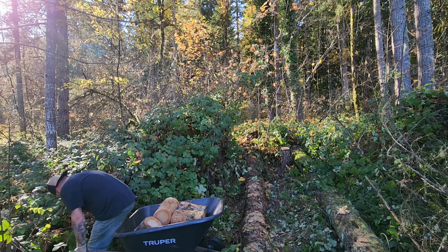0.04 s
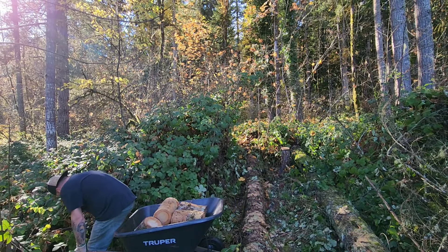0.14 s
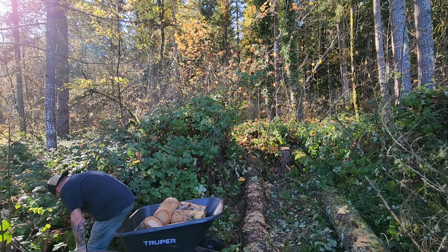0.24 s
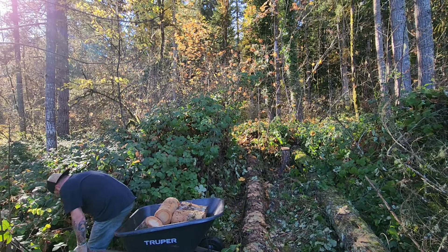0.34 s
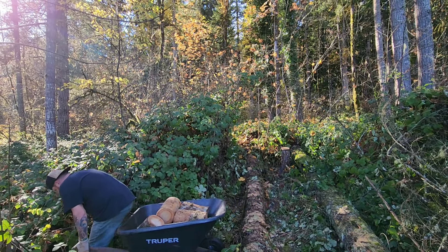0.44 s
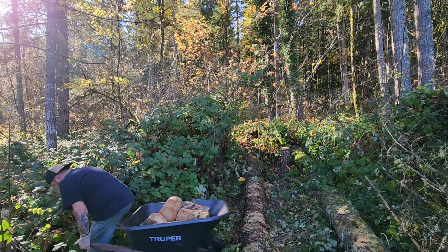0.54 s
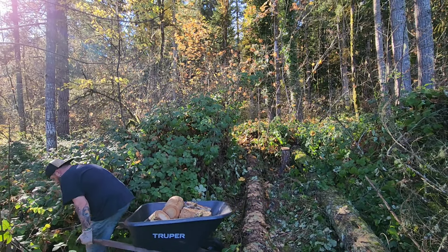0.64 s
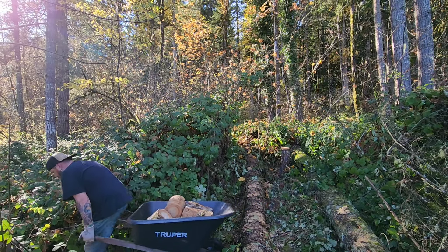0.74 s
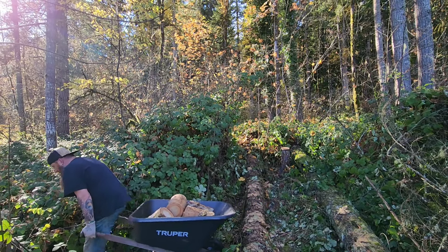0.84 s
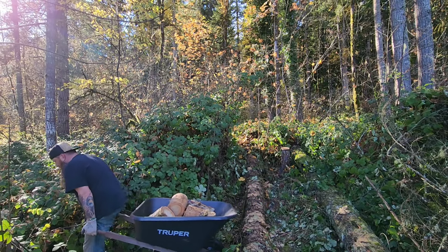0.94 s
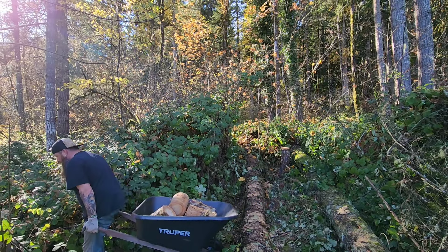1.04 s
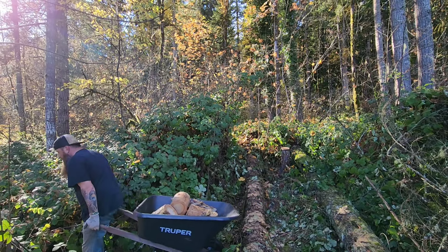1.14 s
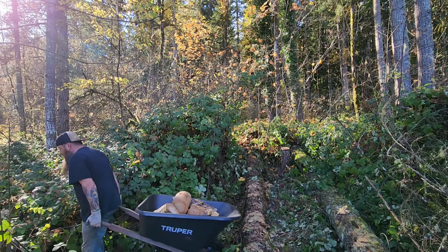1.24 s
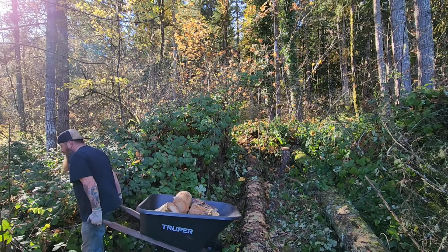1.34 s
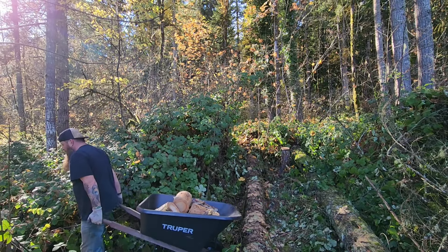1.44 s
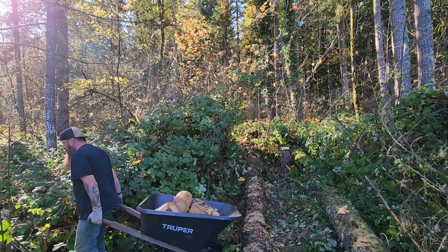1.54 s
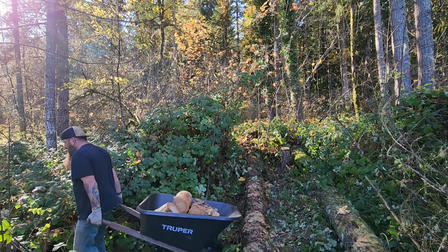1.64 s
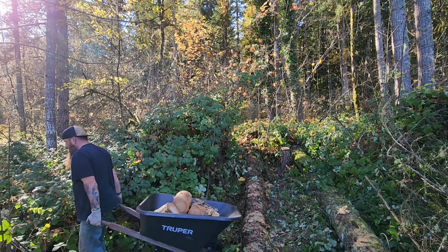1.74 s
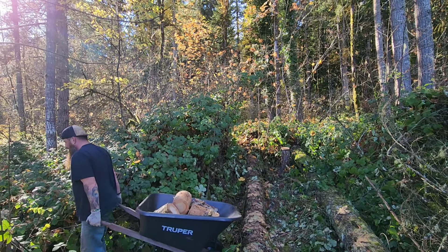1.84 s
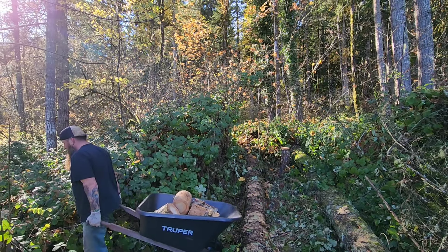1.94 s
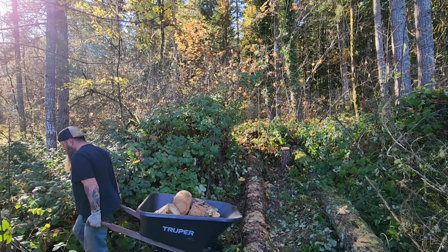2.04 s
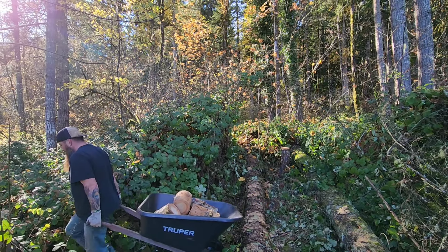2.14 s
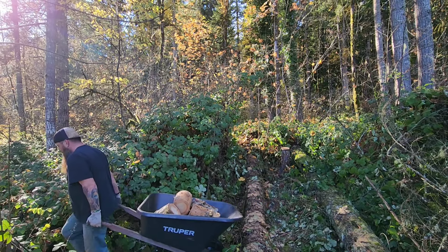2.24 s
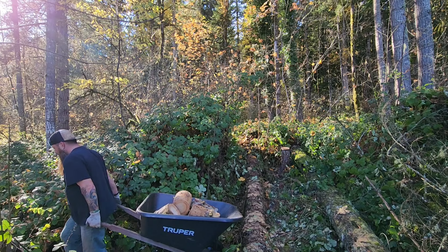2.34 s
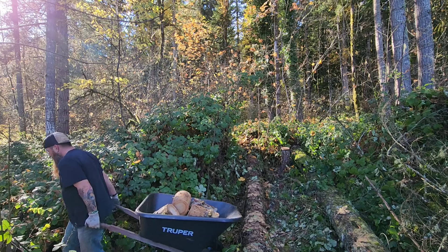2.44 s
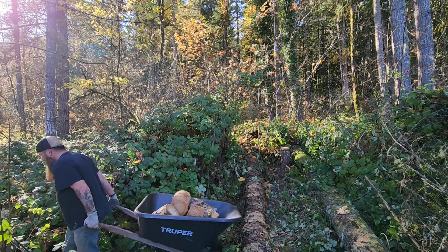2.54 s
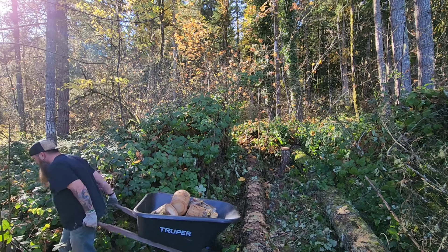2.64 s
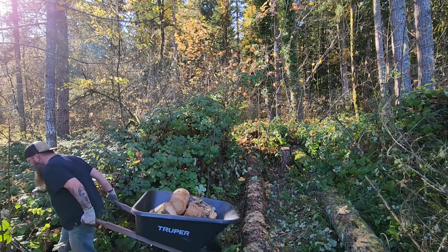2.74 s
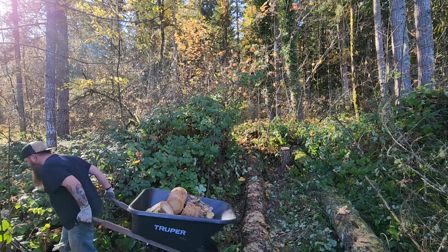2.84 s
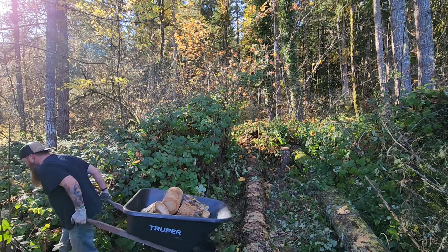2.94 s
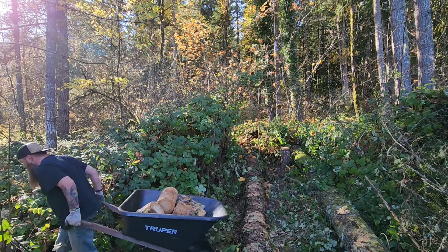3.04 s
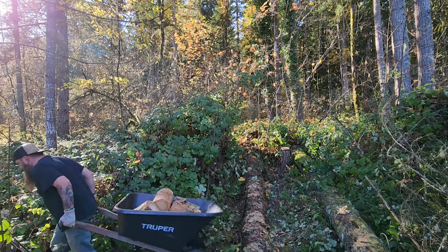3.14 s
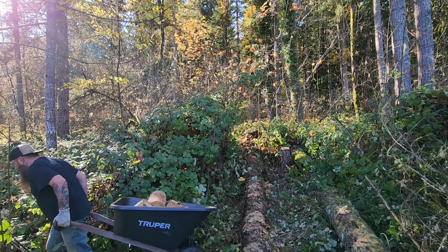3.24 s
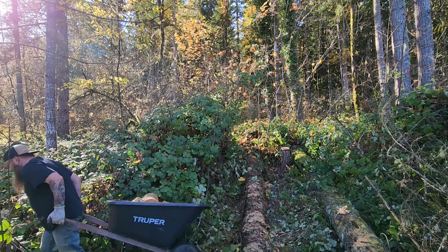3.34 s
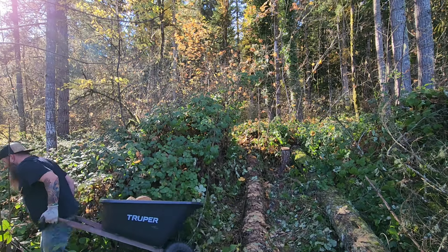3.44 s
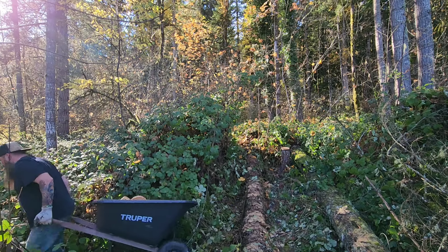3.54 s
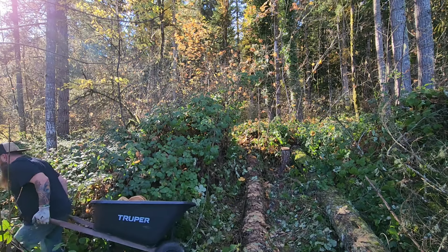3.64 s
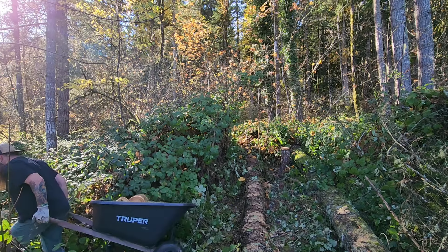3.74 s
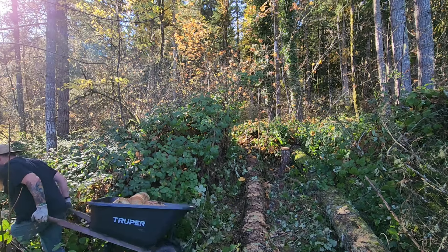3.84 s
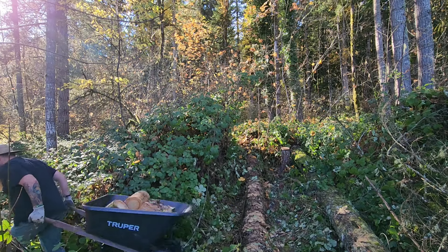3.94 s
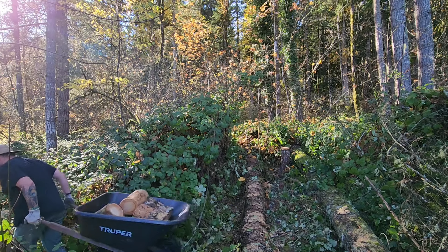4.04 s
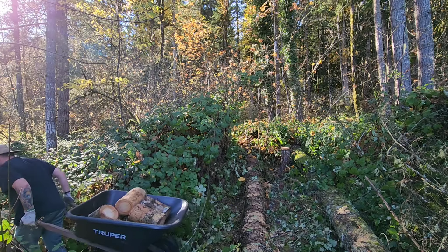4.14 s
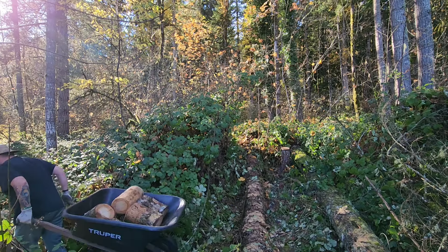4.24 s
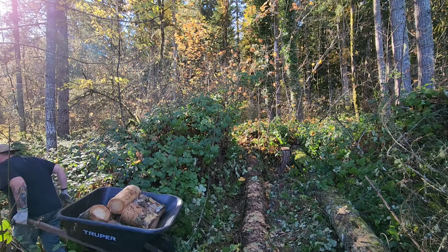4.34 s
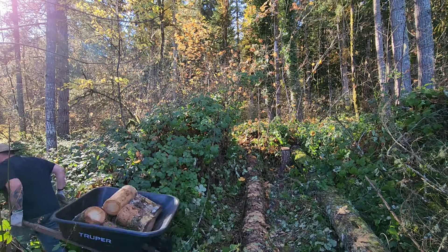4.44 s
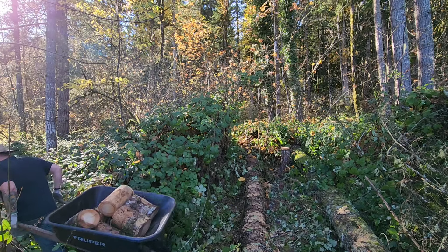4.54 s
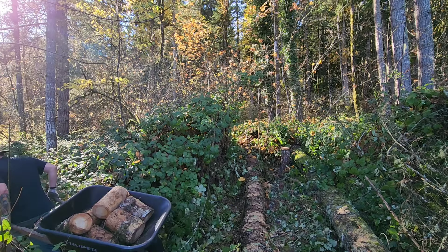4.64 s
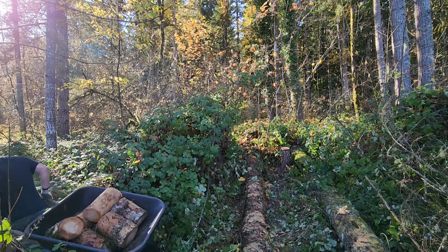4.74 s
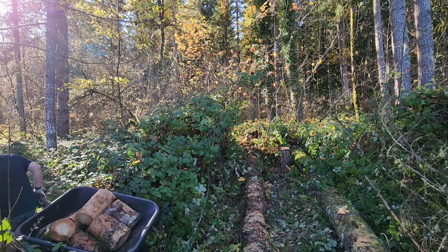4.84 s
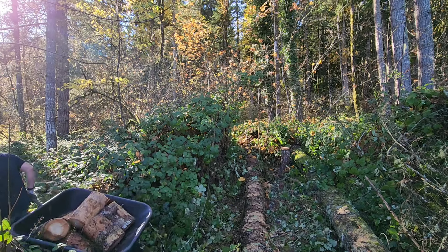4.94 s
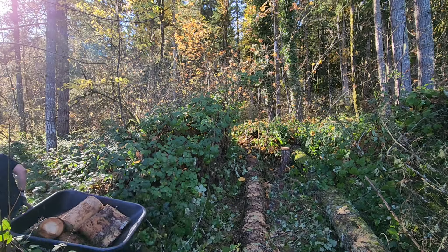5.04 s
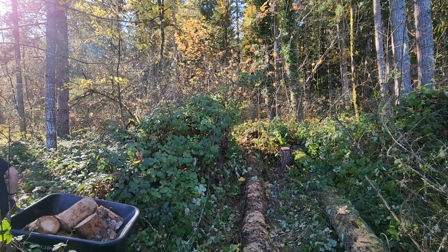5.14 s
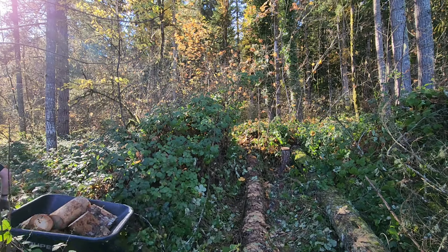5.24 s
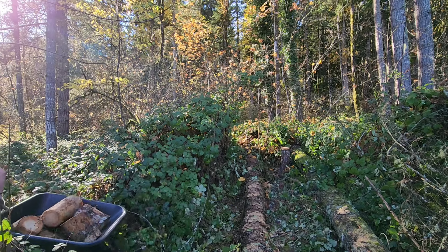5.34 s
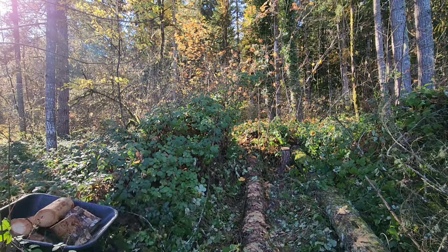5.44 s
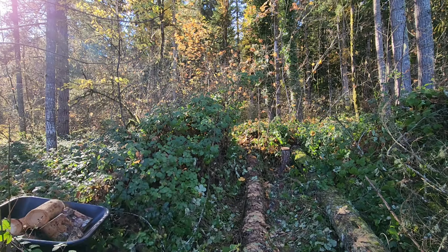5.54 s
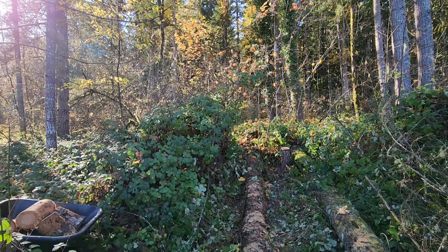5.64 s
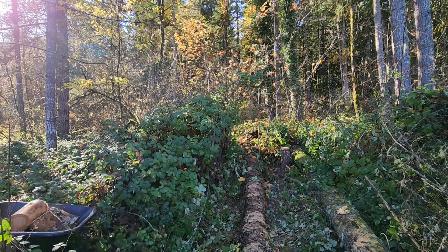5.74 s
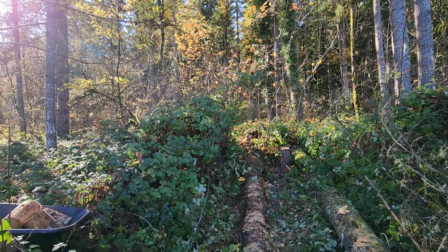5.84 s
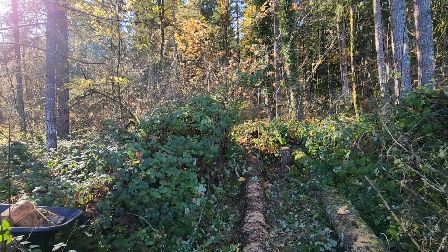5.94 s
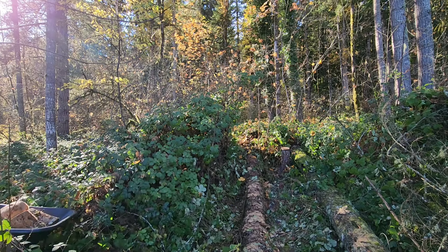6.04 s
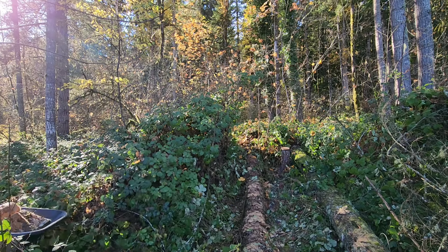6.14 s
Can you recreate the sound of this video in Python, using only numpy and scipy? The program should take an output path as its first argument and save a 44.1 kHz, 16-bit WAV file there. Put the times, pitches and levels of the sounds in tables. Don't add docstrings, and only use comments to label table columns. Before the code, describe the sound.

Heavy wood rounds thud and rattle in a wheelbarrow tub as it jolts over roots, creaks briefly, and rustles away through dry leaves.

```python
import sys
import numpy as np
from scipy import signal
from scipy.fft import rfft, irfft, next_fast_len
from scipy.io import wavfile
from scipy.ndimage import uniform_filter1d

SR = 44100
rng = np.random.default_rng(int(sys.argv[2]) if len(sys.argv) > 2 else 0)


def store_pcm(level_fs):
    pcm = np.round(np.clip(level_fs, -1, 1) * 32767).astype(np.int16)
    wavfile.write(sys.argv[1], SR, np.atleast_2d(pcm).T)


def voltage_ratio(decibels):
    exponent = np.asarray(decibels, float) / 20
    return 10 ** exponent


N = 273414
RIGHT_LAG = 5

# pitch_hz, likeness (0-1)
PORT_LIKENESS = [(60, 0.98), (250, 0.98), (550, 0.81), (1100, 0.38), (2200, 0.46), (5000, 0.23),
                 (15000, 0.044)]
# pitch_hz, left_minus_right_db
LEFT_LEAN = [(60, 1.2), (300, 1.64), (1000, 4), (12000, 2.5)]
# pitch_hz, level_db
FOREST_COLOUR = [(12, -42), (25, -4), (55, 4), (110, -9), (180, -13.5), (350, -11), (1100, -25),
                 (7300, -38.5), (9500, -54), (15000, -92)]
# start_s, level_db, resonance_hz
SWISH_PATH = [
    (4.95, -81, 3000),
    (5.1, -59, 3800),
    (5.25, -56, 4500),
    (5.42, -63, 3770),
    (5.55, -68, 4570),
    (5.66, -65, 4730),
    (5.87, -56.5, 4060),
    (6.0, -59.5, 4000),
    (6.2, -61, 3570),
]
# start_s, peak_db, tyre_pitch_hz
ROOT_DROPS = [
    (2.908, -41, 76),
    (3.15, -36, 77),
    (3.471, -36.5, 74.4),
    (3.629, -25.5, 84),
    (5.103, -27.5, 74),
    (4.73, -33, 61),
    (5.572, -31.5, 84),
    (5.831, -48, 74),
]
# start_s, slips_per_s, level_db
CREAK_PATH = [
    (3.954, 29, -53),
    (4.03, 58, -51),
    (4.13, 92, -53),
    (4.165, 115, -51),
    (4.21, 116, -51),
    (4.275, 54, -52),
    (4.39, 48, -52),
    (4.44, 88, -56),
    (4.52, 60, -59),
]
# pitch_hz, width_hz, level_db
FRAME_MODES = [(584, 130, 2.5), (800, 340, 2), (1040, 146, 2), (1363, 86, -2.5), (2170, 110, -1.5),
               (2720, 120, -3)]
# time_s, effort_db
ROLL_EFFORT = [(0, -82), (0.15, -45.5), (0.31, -57.5), (0.45, -49.5), (0.9, -55.5), (1.2, -61), (1.69, -64),
               (2.0, -62.5), (2.68, -59.5), (2.83, -50.5), (3.5, -46), (3.78, -41), (3.9, -55),
               (4.63, -53.5), (4.75, -48), (5.23, -41.5), (5.8, -52.5), (6.2, -47)]
# time_s, contact_db
BRUSH_CONTACT = [(0.35, -90), (0.5, -64), (0.75, -60.5), (1.02, -70.5), (1.5, -78), (1.6, -61),
                 (1.85, -78.5), (2.1, -65.5), (2.3, -82.5), (2.46, -80), (2.52, -62), (2.68, -68),
                 (3.0, -58), (3.66, -51.5), (3.74, -66), (4.1, -55.5), (4.6, -57.5), (5.23, -51.5),
                 (6.2, -55.5)]
# pitch_hz, level_db
RUMBLE_COLOUR = [(8.8, -45.5), (15, 10.5), (70, 0.5), (86, -2), (108, -3.5), (172, -32), (200, -25.5),
                 (260, -48), (440, -120)]
# pitch_hz, level_db
SHAKE_COLOUR = [(65, -22.5), (110, -2.5), (177, -0.5), (258, -4), (300, -2.5), (419, -8.5), (700, -12.5),
                (900, -17), (1170, -43.5), (1980, -120)]
# pitch_hz, level_db
SCRAPE_COLOUR = [(400, -16.5), (700, -1), (1000, 3), (1500, 4), (2600, -6.5), (3600, -28), (5000, -41)]
# pitch_hz, level_db
LEAF_COLOUR = [(1650, -7.5), (2800, -4), (3500, -4), (4500, -4.5), (5900, -7), (7500, -7), (9600, -11),
               (15300, -14.5), (15800, -59)]
# start_s, peak_db, left_minus_right_db
TWIG_SNAPS = [(0.581, -37.5, 4), (0.767, -46, 1.5), (0.9272, -30.5, 7), (0.952, -33, 4), (1.5709, -32, 10),
              (1.6652, -28.5, 7.5), (1.7216, -43, 6), (1.9638, -32, -1), (2.5449, -31.5, 6),
              (2.852, -44.5, 8), (2.973, -45, 3), (3.025, -39, 6), (3.1818, -37, 2), (3.455, -36, 4),
              (3.527, -33, 5), (3.5604, -22.5, 5), (3.6276, -33, 8), (4.411, -38.5, 0), (4.716, -20.5, 5),
              (4.837, -32, 3), (4.855, -32, 6), (5.524, -43, 7), (5.786, -31.5, 2), (5.206, -39, 6),
              (5.99, -35, 7), (1.591, -43, 1)]
# start_s, peak_db, left_minus_right_db
CRISP_LEAVES = [(1.9, -45, 7), (3.768, -27, 2), (3.8296, -39, 2), (3.8772, -37, 4), (4.0024, -37, 6),
                (4.041, -32.5, 5), (4.3222, -46.5, 0), (4.5075, -38.5, 5), (4.5868, -41, 4),
                (1.243, -44, 11), (5.61, -52, 1), (0.99, -58, 3), (4.717, -13, 2), (1.9645, -20.5, 5.5)]
# pitch_hz, level_db
CRACK_COLOUR = [(1470, -10), (2500, -10), (3420, -10), (3810, -2.5), (4150, -3), (6670, -12), (7250, -9),
                (8710, -7), (9270, -9), (15600, -13)]
# start_s, peak_db, pitch_hz, t60_s
WOOD_KNOCKS = [(0.454, -34, 870, 0.034), (0.583, -30, 1330, 0.087), (0.598, -31.5, 910, 0.055),
               (0.744, -34, 940, 0.08), (0.764, -32.5, 1200, 0.03), (0.846, -40, 1390, 0.022),
               (0.927, -37, 860, 0.022), (0.954, -34, 990, 0.0069), (1.591, -38.5, 1170, 0.01),
               (1.6655, -30.5, 894, 0.0097), (1.962, -36.5, 830, 0.19), (2.545, -35.5, 1740, 0.013),
               (2.803, -36, 780, 0.076), (2.893, -30, 1170, 0.071), (3.147, -35.5, 1080, 0.042),
               (3.337, -36.5, 1590, 0.05), (3.5605, -16.5, 1240, 0.017), (3.62, -26.5, 1500, 0.067),
               (3.83, -37.5, 800, 0.028), (4.093, -29, 1090, 0.023), (4.716, -17, 1350, 0.048),
               (4.756, -31.5, 1380, 0.12), (5.048, -34, 1390, 0.18), (5.122, -32, 830, 0.02),
               (5.522, -31, 740, 0.02), (5.916, -34, 1035, 0.11), (6.128, -32, 714, 0.087),
               (1.571, -52, 910, 0.012), (0.642, -39.5, 810, 0.03), (0.665, -42, 1520, 0.032),
               (0.712, -44, 1910, 0.03), (3.405, -39, 750, 0.066), (3.46, -43.5, 796, 0.054),
               (4.483, -43, 616, 0.031), (4.466, -41, 2000, 0.05)]
# start_s, peak_db, pitch_hz
WALL_TAPS = [(0.4534, -36, 2820), (0.798, -45, 2870), (1.106, -49, 1290), (1.134, -49.5, 1040),
             (1.176, -50, 1520), (1.322, -56, 1650), (1.721, -43.5, 620), (4.393, -39, 890),
             (1.9644, -30.5, 3800), (1.975, -36.5, 3720), (4.712, -32, 1300), (4.718, -24, 2200),
             (3.566, -37, 4570), (3.629, -30, 4500), (4.719, -27, 3830), (2.364, -50, 856),
             (2.852, -41.5, 1560), (2.992, -39.5, 2070), (3.164, -35.5, 1390), (3.232, -39.5, 1120),
             (3.356, -35.5, 1650), (3.5267, -25.5, 2440), (3.6202, -23, 2450), (4.131, -37, 1360),
             (5.098, -32, 970), (5.201, -34.5, 1460), (5.954, -41, 695), (6.1549, -30, 3670),
             (6.1279, -38.5, 2760), (5.61, -47, 4800), (5.206, -32, 3420)]
# pitch_hz, level_db
KNOCK_COLOUR = [(350, -16), (550, 5), (800, -5), (1300, 3), (1700, -3), (2600, -7.5), (4000, -15),
                (9000, -35)]
# start_s, peak_db, body_pitch_hz, ring_t60_s
LOG_DROPS = [(0.452, -33, 178, 0.091), (0.594, -29.5, 307, 0.15), (1.72, -42, 383, 0.072),
             (1.967, -33.5, 248, 0.093), (2.894, -26.5, 332, 0.099), (3.127, -36, 121, 0.049),
             (3.618, -18.5, 207, 0.041), (4.092, -23, 160, 0.048), (4.256, -37, 205, 0.19),
             (4.719, -22, 174, 0.12), (5.523, -23, 186, 0.017), (5.917, -29, 336, 0.086)]
# start_s, peak_db, body_pitch_hz, ring_t60_s
LOAD_BUMPS = [(0.763, -25, 190, 0.044), (0.849, -51, 203, 0.047), (3.144, -26, 192, 0.04),
              (3.166, -29.5, 171, 0.089), (3.337, -29, 333, 0.26), (3.354, -32, 232, 0.13),
              (3.402, -34, 233, 0.04), (3.46, -39, 178, 0.09), (3.546, -35.5, 294, 0.16),
              (3.5617, -15, 480, 0.039), (3.47, -40, 110, 0.081), (3.566, -31, 122, 0.05),
              (3.63, -22, 173, 0.13), (3.713, -27, 320, 0.12), (3.796, -37, 362, 0.12),
              (3.949, -40, 207, 0.019), (3.981, -36, 157, 0.024), (4.287, -25, 220, 0.17),
              (4.345, -32.5, 314, 0.096), (4.48, -32, 282, 0.045), (4.91, -63, 179, 0.06),
              (5.048, -36, 260, 0.21), (5.116, -27, 263, 0.069), (5.179, -28, 113, 0.14),
              (5.33, -40, 119, 0.026), (5.752, -46.5, 344, 0.11), (5.953, -33.5, 267, 0.043),
              (6.125, -31.5, 387, 0.15), (2.895, -27.5, 522, 0.072), (4.756, -24.5, 264, 0.073),
              (4.72, -27, 584, 0.052)]
# start_s, peak_db, body_pitch_hz
LOAD_RATTLES = [(0.918, -46.5, 175), (1.947, -44.5, 189), (2.047, -52, 420), (2.091, -45.5, 458),
                (2.123, -51, 420), (2.166, -51, 402), (2.363, -47, 407), (2.421, -50, 310),
                (2.485, -45, 258), (2.611, -49, 242), (2.666, -47, 266), (2.707, -43.5, 162),
                (2.759, -41, 184), (2.802, -43, 327), (3.094, -37, 162), (3.9, -42.5, 344),
                (5.269, -45, 198), (0.533, -58, 200), (1.13, -48.5, 358), (4.03, -45, 402),
                (4.097, -29.5, 377), (4.79, -36, 247), (0.454, -41, 567), (2.008, -42, 440),
                (0.753, -39, 221), (4.009, -38, 220), (4.045, -43, 200), (4.06, -43, 220), (4.13, -37, 302),
                (2.69, -54, 395), (1.752, -50, 454)]
# pitch_hz, width_hz, level_db
TUB_MODES = [(81.5, 20, 4.5), (121, 58, -21), (171, 26, 4), (213.4, 61, 8), (320, 59, 8), (423, 84, -5.5),
             (556, 70, 11), (640, 270, -17)]


def evened(x):
    return x / np.sqrt(np.mean(x ** 2) + 1e-20)


def peaked(x):
    return x / (abs(x).max() + 1e-12)


def seconds(length_s):
    return np.arange(int(length_s * SR)) / SR


def smoothed(x, width):
    return uniform_filter1d(uniform_filter1d(x, width), width)


def read(points, hz):
    f, value = np.transpose(points)
    return np.interp(np.log(hz + 1), np.log(f + 1), value)


def add(mix, s, sound):
    part = mix[..., round(s * SR):][..., :sound.shape[-1]]
    part += sound[..., :part.shape[-1]]


def ring(x, hz, width):
    r = np.exp(-np.pi * width / SR)
    return signal.lfilter([np.sin(2 * np.pi * hz / SR)], [1, -2 * r * np.cos(2 * np.pi * hz / SR), r * r], x)


def coloured(x, points):
    level_db = read(points, np.abs(np.fft.fftfreq(4096, 1 / SR)))
    log_gain = np.log(voltage_ratio(np.maximum(level_db, -70)))
    taps = np.fft.ifft(np.exp(np.conj(signal.hilbert(log_gain)))).real[:2048]
    taps = taps.reshape((1,) * (x.ndim - 1) + (-1,))
    return signal.oaconvolve(x, taps, axes=-1)[..., :x.shape[-1]]


def ports(a, b):
    size = next_fast_len(N)
    hz = np.fft.rfftfreq(size, 1 / SR)
    same = np.clip(read(PORT_LIKENESS, hz), 0, 1)
    blend = same * rfft(a, size) + np.sqrt(1 - same ** 2) * rfft(b, size)
    right = irfft(blend / voltage_ratio(read(LEFT_LEAN, hz)), size)[:N]
    return np.array([a, np.roll(right, RIGHT_LAG)])


def grains(points, per_s, spread_db, hiss, lump_s, lump_db, patch_db):
    sign, air = rng.standard_normal((2, N)), rng.standard_normal((2, N))
    size = np.minimum(rng.exponential(1, N), 3)
    struck = rng.random(N) < per_s / SR
    clicks = evened(sign * voltage_ratio(spread_db * size) * struck)
    lumps = evened(smoothed(rng.standard_normal(N), max(int(lump_s * SR), 2)))
    z = signal.stft(coloured(clicks + hiss * air, points), nperseg=256)[2]
    patches = rng.standard_normal(z.shape[:0:-1]).T
    patches = uniform_filter1d(uniform_filter1d(patches, size=4, axis=0), size=22, axis=1)
    drifting = signal.istft(z * voltage_ratio(patch_db * evened(patches)), nperseg=256)[1][:, :N]
    a, b = drifting * voltage_ratio(lump_db * lumps)
    return evened(ports(a, b))


def forest_floor():
    return voltage_ratio(-62) * grains(FOREST_COLOUR, 260, 1.5, 5.0, 0.048, 1.5, 2.5)


def trees(x):
    t = seconds(.25)
    taps = rng.standard_normal((2, len(t))) * (rng.random((2, len(t))) < .2)
    taps = taps * voltage_ratio(-60 * t / 0.09) * (t > .004)
    return ports(*signal.oaconvolve(x, taps / np.linalg.norm(taps[0]), axes=1)[:, :N])


def swish():
    s, db, hz = np.transpose(SWISH_PATH)
    t, width_hz = np.arange(N) / SR, 1200
    r = np.exp(-np.pi * width_hz / SR)
    wander = evened(smoothed(rng.standard_normal(N), 900))
    path_hz = np.interp(t, s, hz) * (1 + 0.095 * wander)
    turn = np.exp(2j * np.pi * np.cumsum(path_hz) / SR)
    low = rng.standard_normal((2, N)) / turn
    for _ in range(2):
        low = signal.lfilter([1 - r], [1, -r], low)
    clumps = evened(smoothed(rng.standard_normal(N), 500))
    return voltage_ratio(np.interp(t, s, db, -120) + 2.5 * clumps) * evened(ports(*(turn * low).real))


def roots():
    t, out = seconds(.3), np.zeros(N)
    t60, rise_s = 0.16, 0.012
    for s, db, hz in ROOT_DROPS:
        swell = voltage_ratio(db - 60 * t / t60) * (1 - np.exp(-t / rise_s))
        add(out, s, swell * 2 * np.sin(2 * np.pi * hz * t))
    return ports(out, out)


def creak():
    s, per_s, db = np.transpose(CREAK_PATH)
    t = np.arange(N) / SR
    turns = np.cumsum(np.interp(t, s, per_s, 0, 0)) / SR
    slips = np.diff(np.ceil(turns), prepend=0) * voltage_ratio(1.5 * rng.standard_normal(N))
    slips /= np.sqrt(np.interp(t, s, per_s) / 100)
    loose_db = np.interp(t, (4, 4.44), (-9, 0))
    tone = np.zeros(N)
    for f, width, level in FRAME_MODES:
        mode = np.roll(ring(slips, f, width), int(f / 12))
        tone += voltage_ratio(level + loose_db * (f > 2000)) * mode
    tone = tone / tone[(t > s[0]) & (t < s[-1])].std() * voltage_ratio(np.interp(t, s, db) - 1.0)
    return np.array([tone, np.roll(tone, RIGHT_LAG) * voltage_ratio(-3.5)])


def bend():
    start_s, end_s, width_hz = 4.01, 4.075, 200
    t, out = seconds(end_s - start_s), np.zeros(N)
    turn = np.exp(2j * np.pi * np.cumsum(np.linspace(597, 1210, len(t))) / SR)
    r = np.exp(-np.pi * width_hz / SR)
    rub = signal.lfilter([1 - r], [1, -r], rng.standard_normal(len(t)) / turn)
    add(out, start_s, voltage_ratio(-45.5) * evened((turn * rub).real) * np.sqrt(np.hanning(len(t))))
    return ports(out, out)


def snaps(rows, low_hz):
    t, out = seconds(.12), np.zeros((2, N))
    for (s, db, pan_db), draw in zip(rows, rng.standard_normal((len(rows), 3, len(t)))):
        t60 = np.clip(0.016 - 0.35 * (db + 41), .004, .1)
        burst = (voltage_ratio(-60 * t / t60) + 0.083 * voltage_ratio(-60 * t / 0.11)) * np.minimum(t / 0.0011, 1)
        pair = np.array([draw[0], 0.62 * draw[0] + 0.99 * draw[1]])
        pair[:, round(.001 * SR)] = 2.84
        crack = coloured(pair * burst * voltage_ratio(3.4 * draw[2]), CRACK_COLOUR)
        crack = peaked(signal.lfilter(*signal.butter(2, low_hz, "high", fs=SR), crack))
        left, right = voltage_ratio(db) * crack * voltage_ratio(np.array([[.5], [-.5]]) * pan_db)
        add(out[0], s, left)
        add(out[1], s + RIGHT_LAG / SR, right)
    return out


def drag():
    t = np.arange(N) / SR
    roll_db = np.interp(t, *np.transpose(ROLL_EFFORT))
    brush_db = np.interp(t, *np.transpose(BRUSH_CONTACT))
    jolt, keep = np.zeros(N), voltage_ratio(-60 / (0.19 * SR))
    for s, db, *_ in blows():
        add(jolt, s, voltage_ratio(min(db, -20)) * np.full(400, 1 / 400))
    jolt = signal.lfilter([1], [1, -keep], jolt)
    both_db = 0.52 * roll_db + (1 - 0.52) * brush_db + 55
    rumble_level = voltage_ratio(roll_db) + voltage_ratio(-36) * jolt
    shake_level = voltage_ratio(-57 + both_db) + voltage_ratio(-22.5) * jolt
    scrape_level = voltage_ratio(-62 + 0.96 * (brush_db + 54.5)) + voltage_ratio(-38.5) * jolt
    rumble = rumble_level * grains(RUMBLE_COLOUR, 80, 2.0, 0.73, 0.011, 0.97, 0)
    shake = shake_level * grains(SHAKE_COLOUR, 150, 1.9, 1.0, 0.011, 0.77, 0.44)
    scrape = scrape_level * grains(SCRAPE_COLOUR, 500, 2.8, 0.85, 0.012, 3.1, 1.5)
    rustle = voltage_ratio(brush_db) * grains(LEAF_COLOUR, 900, 3.9, 1.64, 0.02, 1.53, 2.2)
    return rumble + shake + scrape + rustle


def knocks():
    rows = WOOD_KNOCKS + [(*row, 0.036) for row in WALL_TAPS]
    t, out = seconds(.12), np.zeros((2, N))
    for (s, db, hz, t60), draw in zip(rows, rng.standard_normal((len(rows), 3, len(t)))):
        fade_db = -60 * t / np.clip(t60, .005, .15)
        burst = draw[:2] * voltage_ratio(3.13 * draw[2] + fade_db) * np.minimum(t / 0.0012, 1)
        burst[:, round(.0005 * SR)] = -2.7
        wood = peaked(coloured(burst, KNOCK_COLOUR))
        note = peaked(ring(burst, hz, 0.17 * hz))
        add(out, s, voltage_ratio(db) * peaked(0.91 * wood + note))
    return ports(*out)


def blows():
    bounces = [(s + .036, db - 18.5, hz * 0.73, 0.061) for s, db, hz, _ in LOG_DROPS]
    logs = [(*row, 0.7) for row in LOG_DROPS + bounces]
    bumps = [(*row, 0.39) for row in LOAD_BUMPS]
    rattles = [(*row, 0.084, 0.42) for row in LOAD_RATTLES]
    return logs + bumps + rattles


def thuds():
    t, out, rows = seconds(.2), np.zeros(N), blows()
    for (s, db, hz, t60, rebound), draw in zip(rows, rng.standard_normal((len(rows), 2, len(t)))):
        t60 = np.clip(t60, .012, .3)
        hits = draw[0] * (abs(draw[1]) > 2.8) * rebound * voltage_ratio(-60 * t / t60)
        hits[0] = -1
        push = signal.lfilter(np.hanning(int(.3 * SR / hz) + 3), 1, hits)
        body = ring(ring(push, hz, 6.3 / t60), hz, 0.88 * hz)
        tub = sum(voltage_ratio(d) * ring(push, f, w) for f, w, d in TUB_MODES)
        add(out, s, voltage_ratio(db) * peaked(peaked(body) - 0.84 * peaked(tub)))
    return ports(out, np.roll(out, 60) * 0.5)


def slam():
    t, out = seconds(.02), np.zeros(N)
    swing = t * np.exp(-t / 0.00076) * np.sin(2 * np.pi * 470 * t)
    add(out, 3.5607, -voltage_ratio(-7) * peaked(swing))
    return ports(out, out)


def scene():
    twigs, crisps = snaps(TWIG_SNAPS, 510), snaps(CRISP_LEAVES, 6900)
    hits = slam() + thuds() + knocks() + twigs + crisps
    background = forest_floor() + voltage_ratio(-12) * trees(hits) + swish()
    return background + roots() + creak() + bend() + drag() + hits


def top_cut(x):
    return signal.sosfilt(signal.butter(12, 16610, fs=SR, output="sos"), x)


def record(dry):
    edge = signal.firwin(511, 16000, window=("kaiser", 9), fs=SR)[None]
    thinned = signal.lfilter(*signal.butter(2, 50, "high", fs=SR), dry)
    mix = signal.oaconvolve(thinned, edge, "same")
    return top_cut(mix)


dry = scene()
out = record(dry)
store_pcm(out)
```